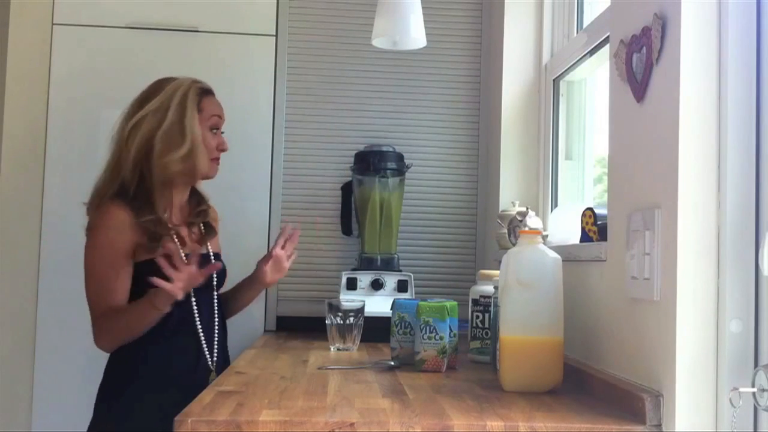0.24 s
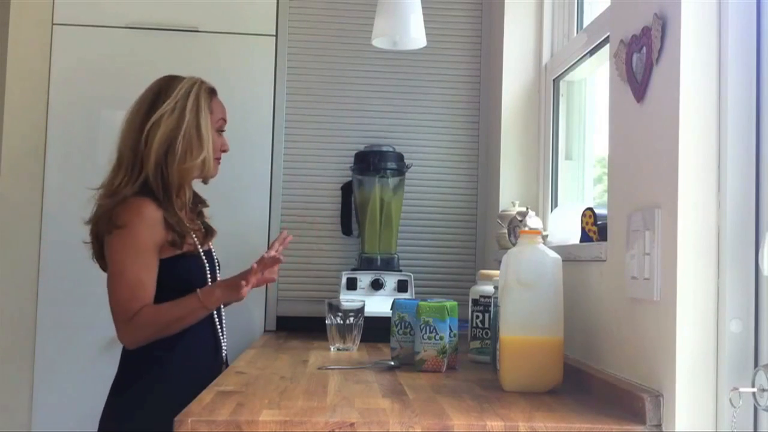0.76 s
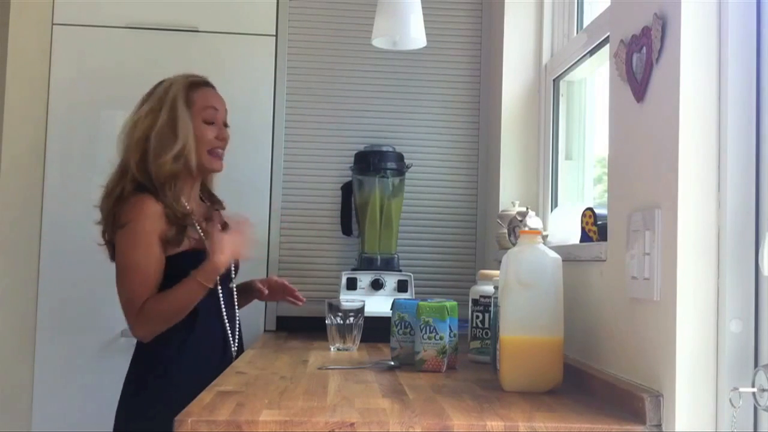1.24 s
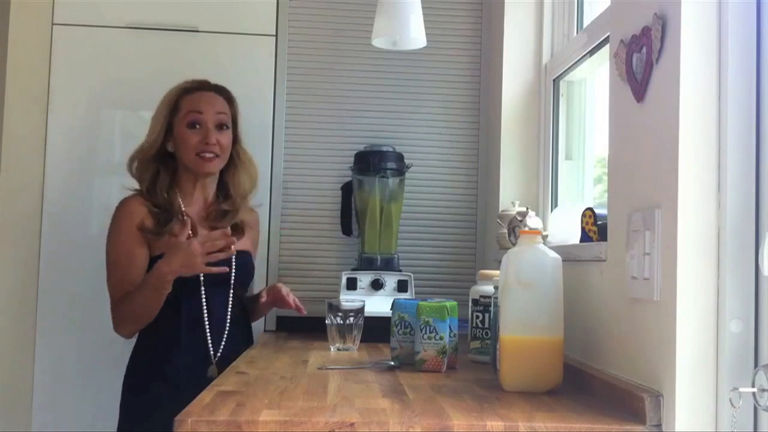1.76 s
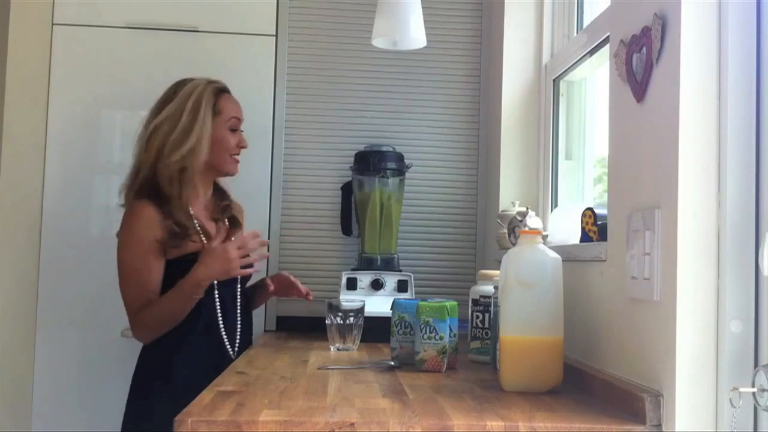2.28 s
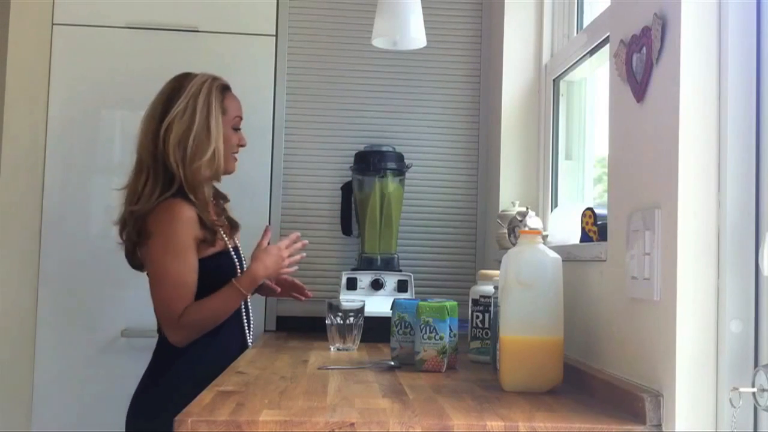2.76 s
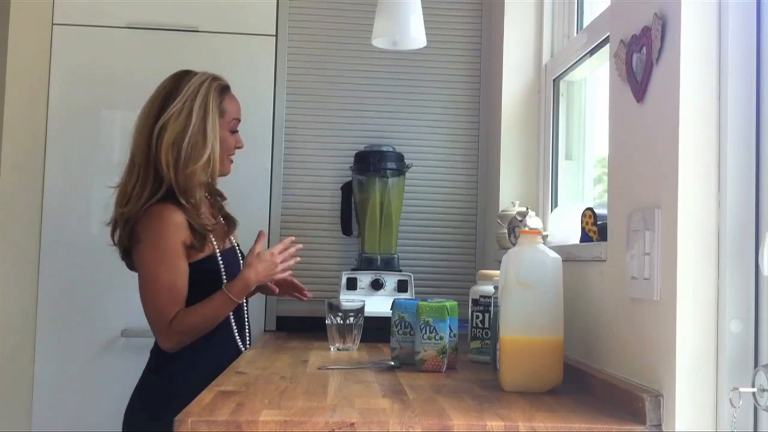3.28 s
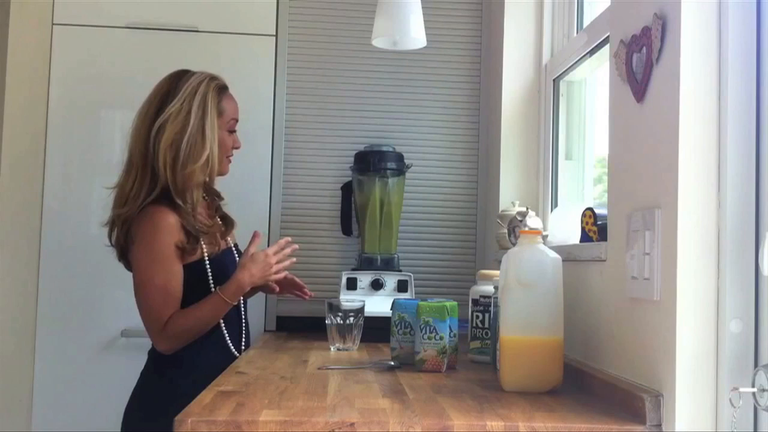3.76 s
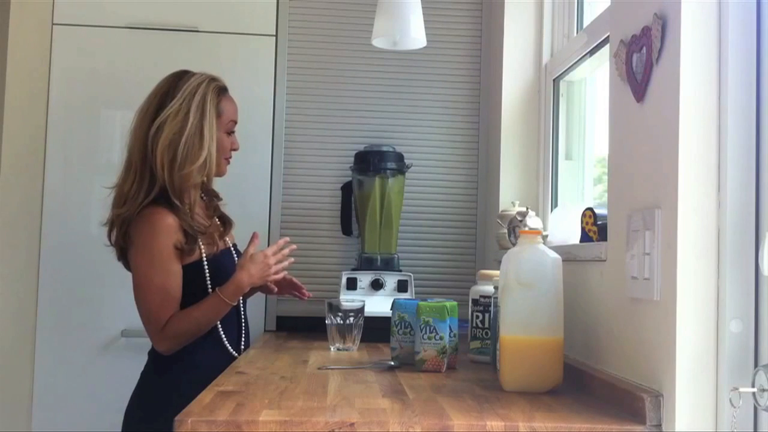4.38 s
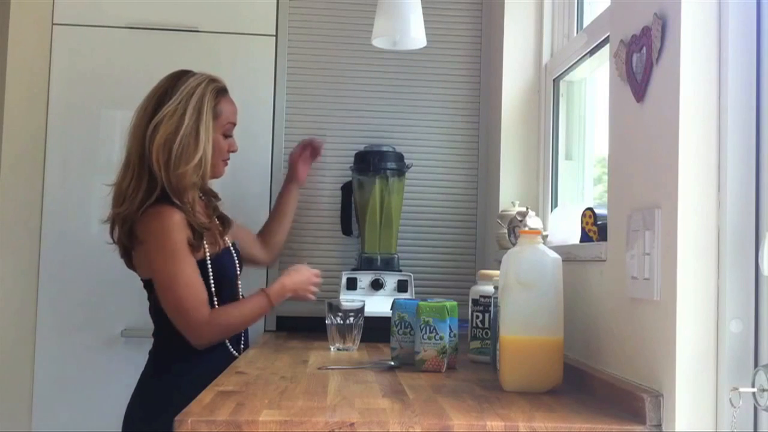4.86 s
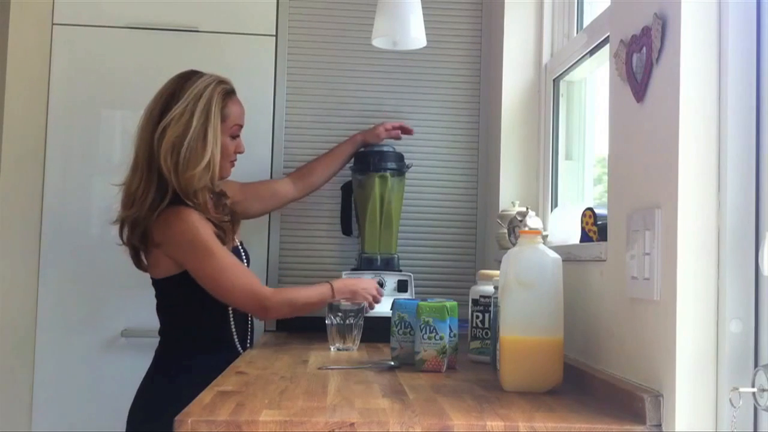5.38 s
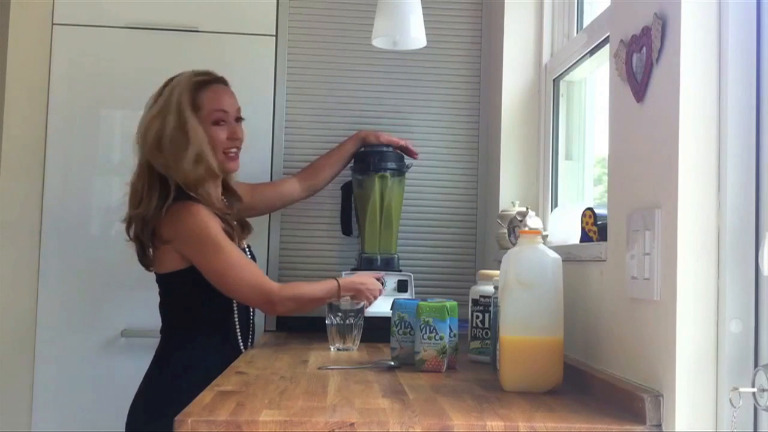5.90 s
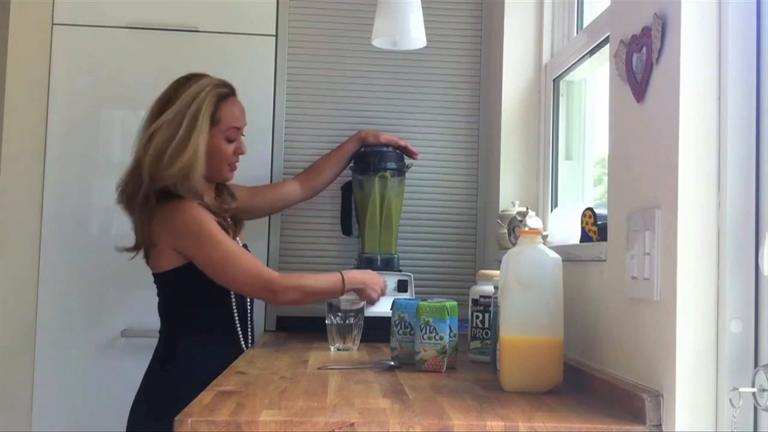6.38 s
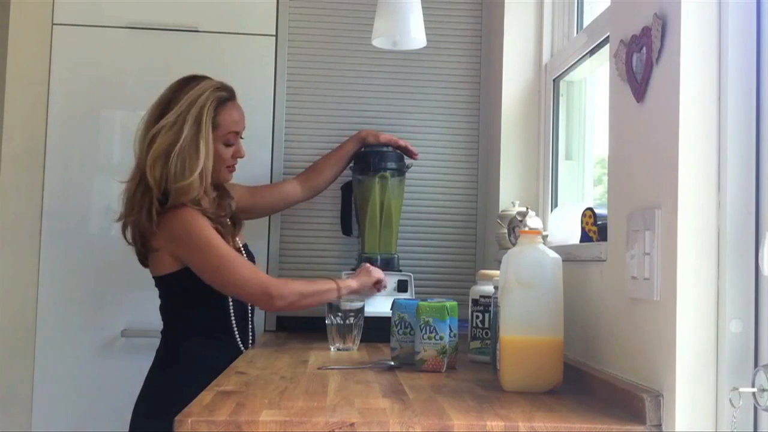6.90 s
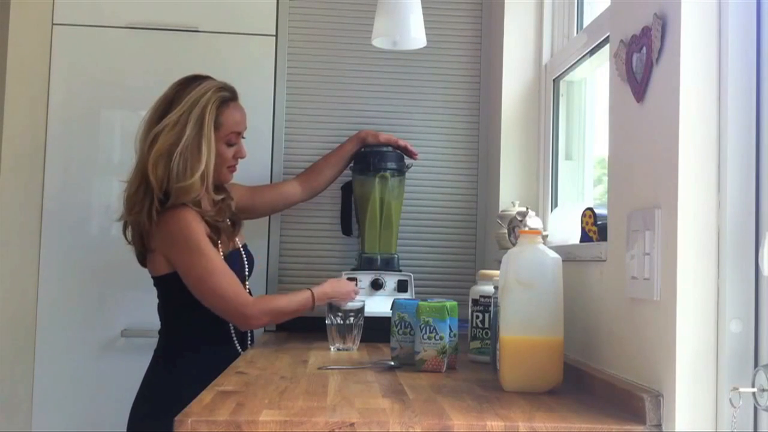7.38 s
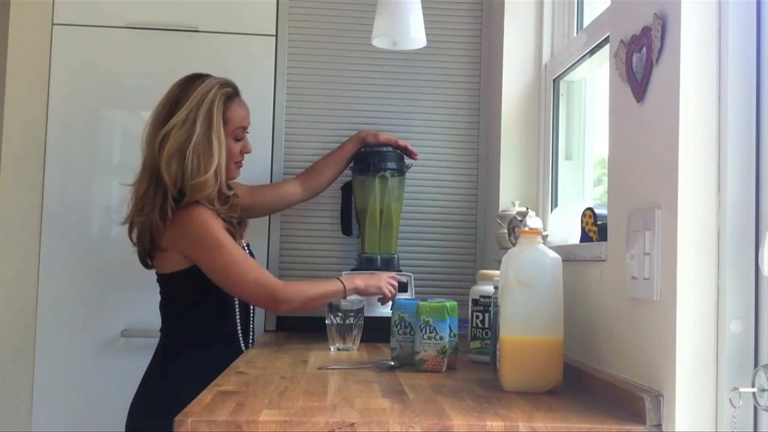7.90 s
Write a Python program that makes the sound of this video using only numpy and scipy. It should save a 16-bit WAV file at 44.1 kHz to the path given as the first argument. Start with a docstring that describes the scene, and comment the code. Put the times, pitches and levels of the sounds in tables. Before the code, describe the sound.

A jug blender is already running flat out in a small hard-walled kitchen, heard fairly close. A strong hum wavers two or three times a second, with short hollow howls, a rough coupling rattle, churning liquid and rushing fan air. Near the end it is switched off; howl and hum drop away and the rotor coasts downward with a loose rattle.

```python
"""A jug blender runs flat out on a smoothie in a kitchen, then is switched off and coasts down.
The shaft hums through the housing and surges as the vortex grabs the blades: tones locked to its turns.
The jug howls in fits, the coupling rattles, the liquid churns and the cooling fan rushes: resonances and
shaped noise. The rotor's multiples glide down as it slows, each louder while inside the housing's boom."""
import sys
import numpy as np
from scipy import signal
from scipy.fft import rfft, irfft
from scipy.io import wavfile

SR = 44100
rng = np.random.default_rng(int(sys.argv[2]) if len(sys.argv) > 2 else 0)


def generate_wav(sig):
    """Save sig (samples, or channels by samples) to the path in sys.argv[1] as 16-bit PCM at SR."""
    pcm = np.round(np.clip(np.atleast_2d(sig).T, -1, 1) * 32767).astype(np.int16)
    wavfile.write(sys.argv[1], SR, pcm)


N = 359136

FULL_HZ = 326.7  # reference for full speed, turns per second
OFF_S = 7.51  # the switch


def undb(db):
    """Decibels to an amplitude factor."""
    return 10 ** (np.asarray(db) / 20)


def unit(x):
    """Scaled to rms 1."""
    return x / np.sqrt(np.mean(np.abs(x) ** 2))


def curve(rows):
    """Rows (time_s, value) joined by straight lines."""
    return np.interp(np.arange(N) / SR, *np.transpose(rows))


def bumps(rows):
    """Smooth bells from rows (centre_s, length_at_half_height_s, height)."""
    t = np.arange(N) / SR
    return sum(height * 0.5 ** ((2 * (t - at) / length) ** 2) for at, length, height in rows)


def flutter(hz, size=32):
    """Smooth chance with spread 1, no faster than about hz; drawn once every size samples."""
    at = np.arange(0, N + size, size)
    smooth = signal.butter(4, hz, fs=SR / size, output="sos")
    slow = signal.sosfilt(smooth, rng.standard_normal(len(at)))
    return np.interp(np.arange(N), at, unit(slow))


def colour(x, points):
    """Filters x by a curve of (pitch_hz, level_db) points, then scales it to rms 1."""
    hz, db = np.transpose(points)
    f = np.maximum(np.arange(N // 2 + 1) * SR / N, 1)
    gain = undb(np.interp(np.log(f), np.log(hz), db))
    return unit(irfft(rfft(x) * gain, N))


def ring(x, hz, width):
    """A steep-sided resonance, gain 1 at its centre: two passes, each of the given width in Hz."""
    b, a = signal.iirpeak(hz, hz / width, fs=SR)
    return signal.lfilter(b, a, signal.lfilter(b, a, x))


def rumble(hz, width):
    """A resonance kept going by turbulence, rms 1."""
    return unit(ring(rng.standard_normal(N), hz, width))


def kitchen(x, wet_db, t60=0.35):
    """Direct sound plus a short dense tail from hard walls and cupboards."""
    t = np.arange(SR // 2) / SR
    decay = np.exp(-np.log(1000) * t / t60)
    tail = rng.standard_normal(len(t)) * decay * (t > 0.003)
    echo = signal.fftconvolve(x, tail / np.linalg.norm(tail))[:N]
    return (x + undb(wet_db) * echo) / np.sqrt(1 + undb(2 * wet_db))


def tone(turns, multiple, rough, flutter_hz):
    """One multiple of the shaft, shaken in size and phase by the uneven load."""
    angle = 2 * np.pi * multiple * turns
    in_step = (1 + rough * flutter(flutter_hz)) * np.cos(angle)
    out_of_step = rough * flutter(flutter_hz) * np.sin(angle)
    return unit(in_step + out_of_step)


def shaft(run_hz=331.96, wander_hz=1.0):
    """Turns per second and blade load: the load brakes the shaft once a surge; after the switch drag slows it."""
    # how far each surge swings the driven shaft: time_s, swing_hz
    surge_swing = [(.2, 2.9), (.9, 1.1), (2.0, 1.92), (4.2, 3.5), (5.4, 3.08), (6.4, 2.0), (7.4, 2.47)]
    first_surge_s, surges_per_s, quicken_per_s2 = 0.218, 2.466, 0.028
    # the drive eases off around coast_from_s; drag then has the time constant coast_tau_s
    coast_from_s, coast_ease_s, coast_tau_s = 7.5, 0.038, 0.59
    t = np.arange(N) / SR
    # the vortex lets go of the blades and grabs them again, quicker as the drink thins
    since = t - first_surge_s
    cycle = 2 * np.pi * (surges_per_s * since + quicken_per_s2 * since ** 2 / 2)
    driven = run_hz + curve(surge_swing) * np.cos(cycle) + wander_hz * flutter(7.16)
    coasted_s = coast_ease_s * np.logaddexp(0, (t - coast_from_s) / coast_ease_s)
    return driven * np.exp(-coasted_s / coast_tau_s), np.sin(cycle)


def hum(turns, load, powered, load_db=0.86, waver_db=1.0):
    """The unbalanced rotor shakes the housing once a turn, harder while the blades are loaded."""
    # level under power, ahead of load, waver and dips: time_s, level_db
    hum_level = [(0, -19.6), (1.0, -18.5), (2.0, -17.5), (3.0, -16.5), (3.7, -18.5), (5.4, -17.2),
                 (6.6, -18), (7.5, -19.5)]
    # the hum dips briefly: centre_s, length_s at half depth, depth_db
    hum_dips = [(1.03, 0.13, 4.5), (1.42, 0.03, 8), (1.66, 0.06, 5), (2.23, 0.053, 6), (2.46, .1, 5.5),
                (2.92, 0.085, 4.5), (3.5, 0.22, 3.5), (4.15, 0.049, 4.5), (5.13, 0.071, 6.5),
                (5.91, 0.046, 10), (6.03, 0.037, 9)]
    db = curve(hum_level) + load_db * load + waver_db * flutter(8.5) - bumps(hum_dips)
    return tone(turns, 1, rough=0.12, flutter_hz=27.2) * undb(db) * powered


def whine(turns, powered, waver_db=1.63):
    """Overtones of the blades and motor under load, each waxing and waning on its own."""
    # overtones of the driven shaft: multiple of shaft speed, level_db ahead of the waver, roughness 0-1
    overtones = [(2, -36, 0.19), (3, -42, 0.32), (4, -47.5, 0.9), (6, -41.2, .55), (10, -45.7, 0.5),
                 (11.7, -48.5, 0.5), (14, -48, 0.6), (16.4, -52, 0.4)]
    total = 0
    for multiple, db, rough in overtones:
        level = undb(db + waver_db * flutter(4))
        total = total + level * tone(turns, multiple, rough, flutter_hz=27.2)
    return powered * total


def coast(turns, speed, powered):
    """Without drive the rotor runs loose; its falling multiples are lifted while inside the boom."""
    # multiple of shaft speed, level_db at full speed outside the boom,
    # power of speed it falls with (below 0 it grows as the shaft slows)
    loose_multiples = [(1, -39.5, 2.4), (2, -36.5, 1.04), (2.6, -46, -0.14), (3, -41.5, 1.5), (4, -46, .8)]
    # boom of the housing and jug: pitch_hz, width_hz, lift_db
    hz, width, lift_db = (372, 107, 15.1)
    shake = 0
    for multiple, db, fade in loose_multiples:
        from_centre = (multiple * speed * FULL_HZ - hz) / (width / 2)
        in_boom = 1 / (1 + from_centre ** 8)
        level = undb(db + lift_db * in_boom) * speed ** fade
        shake = shake + level * tone(turns, multiple, rough=0.16, flutter_hz=29.8)
    return kitchen(shake * (1 - powered), wet_db=-11)


def howl_strength(attack_s=0.021, release_s=0.028, trim_db=-1.37, rest_db=-38.5):
    """Each fit swells, holds and dies exponentially, above a faint steady note."""
    # fits of howling: hold_start_s, hold_length_s, level_db ahead of the shared trim
    fits = [(0.005, 0.049, -25), (0.51, 0.13, -26.5), (0.67, 0.13, -25), (0.857, 0.048, -26.5),
            (0.95, 0.119, -29.5), (1.1, 0.18, -24.5), (1.364, 0.048, -26), (1.579, 0.032, -26.5),
            (1.697, 0.059, -32), (1.826, 0.047, -30.5), (1.924, 0.15, -25.5), (2.134, 0.1, -28.5),
            (2.291, 0.194, -28), (2.629, 0.049, -33), (2.974, 0.063, -29), (3.115, 0.056, -24.5),
            (3.54, 0.029, -24), (3.76, 0.08, -27.5), (4.752, 0.07, -26), (5.447, 0.48, -26),
            (6.05, 0.21, -26), (6.352, 0.37, -25), (6.811, 0.28, -25), (7.171, 0.151, -27),
            (7.402, 0.059, -28)]
    t = np.arange(N) / SR
    strength = undb(rest_db)
    for start, length, db in fits:
        before = np.maximum(start - t, 0) / attack_s
        after = np.maximum(t - start - length, 0) / release_s
        strength = np.maximum(strength, undb(db + trim_db) * np.exp(-(before + after)))
    return strength


def howl(turns, powered, hz=1335, width=100, locked=1.2, fitful_db=1.2):
    """Four blade passes a turn fall on a mode of the jug; bubbles torn off the blades blur and break the note."""
    blades = tone(turns, 4, rough=0.55, flutter_hz=26)
    note = (rumble(hz, width) + locked * blades) * undb(fitful_db * flutter(26.0))
    return unit(note) * howl_strength() * powered


def rattle(turns, speed, scatter_db=7.5, late_s=0.000797, grit=0.16, fade=0.35):
    """The coupling knocks once a turn, unevenly, and scrapes in between; the jug base rings."""
    # rings of the coupling and jug base: pitch_hz, width_hz of each filter pass, relative level_db
    rings = [(1350, 140, 2), (1513, 130, 0), (1994, 90, 3.5), (2333, 410, -10), (3360, 230, -12.5)]
    # how hard the coupling rattles at full speed, ahead of the clatters: time_s, level_db
    rattle_level = [(0, -41.5), (1.8, -33), (2.6, -32), (4.2, -37), (7.4, -34)]
    # the slack coupling clatters as the shaft slows: centre_s, length_s at half height, lift_db
    clatters = [(7.6, .04, 2), (7.84, 0.053, 4), (8.03, 0.027, 2.5)]
    at = np.flatnonzero(np.diff(np.floor(turns)))
    chance = rng.standard_normal((len(at), 2))
    late = np.round(late_s * SR * chance[:, 0]).astype(int)  # early or late by chance
    knocks = np.zeros(N)
    # no knock is much louder than the rest
    knocks[np.clip(at + late, 0, N - 1)] = undb(scatter_db * np.minimum(chance[:, 1], 2))
    push = knocks + grit * rng.standard_normal(N)
    body = sum(undb(db) * ring(push, hz, width) for hz, width, db in rings)
    level = undb(curve(rattle_level) + bumps(clatters)) * speed ** fade
    return unit(kitchen(body, wet_db=1.0)) * level


def churn(speed, level_db=-31.5, boom_hz=362, boom_width=88, boom_db=-31, fade=1.43, boom_fade=1.8):
    """Turbulent liquid beats on the jug and keeps its boom going."""
    # spectrum of the churning liquid: pitch_hz, relative level_db per Hz
    churn_spectrum = [(30, -27), (80, -25), (115, -19), (215, -9), (265, -18), (350, 10), (480, 0),
                      (760, 1.5), (1130, -4), (1600, -2.5), (2300, -6), (2850, -18.5), (6000, -22.5)]
    slosh = colour(rng.standard_normal(N), churn_spectrum) * undb(level_db + 1.26 * flutter(16))
    boom = rumble(boom_hz, boom_width) * undb(boom_db)
    return kitchen(slosh * speed ** fade, wet_db=-10) + boom * speed ** boom_fade


def fan(speed, level_db=-31.5, fade=2.16, hiss_hz=4500, hiss_fade=2.9):
    """Air rushes through the vents; as the fan slows, its hiss dies before its lower rush."""
    # spectrum of the cooling air: pitch_hz, relative level_db per Hz
    air_spectrum = [(300, -24), (1000, 0), (1800, -1.5), (2400, 5), (2880, -6), (3400, 0.5), (4600, 0),
                    (6300, -4), (8000, -6), (9800, -9.5), (10400, -13), (12000, -16.5), (15500, -58)]
    air = colour(rng.standard_normal(N), air_spectrum)
    rush = signal.sosfiltfilt(signal.butter(1, hiss_hz, fs=SR, output="sos"), air)
    hiss = air - rush
    flow = rush * speed ** fade + hiss * speed ** hiss_fade
    gusty = flow * undb(level_db + 0.36 * flutter(16))
    return kitchen(gusty, wet_db=-7, t60=0.3)


def windings(powered):
    """The field coils buzz with the mains for as long as current flows."""
    # magnetic buzz at multiples of twice the mains rate: pitch_hz, level_db
    mains_buzz = [(240, -70), (360, -39), (480, -51), (1200, -51.5)]
    t = np.arange(N) / SR
    return powered * sum(undb(db) * unit(np.sin(2 * np.pi * hz * t)) for hz, db in mains_buzz)


def worktop(speed, hz=155, width=50, level_db=-52.5, fade=0.39):
    """The wooden worktop drones unevenly under the blender's feet."""
    return rumble(hz, width) * undb(level_db + 2.2 * flutter(8.7)) * speed ** fade


def scene():
    """The shaft's speed and turns drive the machine; the mains buzz follows the current alone."""
    hz, load = shaft()
    turns, speed = np.cumsum(hz) / SR, hz / FULL_HZ
    # the drive dies away within a few hundredths of a second of the switch
    powered = np.exp(-np.maximum(np.arange(N) / SR - OFF_S, 0) / 0.01)
    motor = hum(turns, load, powered) + whine(turns, powered) + coast(turns, speed, powered)
    jug = howl(turns, powered) + rattle(turns, speed) + churn(speed)
    background = fan(speed) + windings(powered) + worktop(speed)
    return (motor + jug + background)[None]


def record(dry, top_hz=15480):
    """A steep low-pass filter cuts the top."""
    return signal.sosfilt(signal.ellip(10, 0.1, 80, top_hz, fs=SR, output="sos"), dry)


dry = scene()
out = record(dry)
generate_wav(out)
```